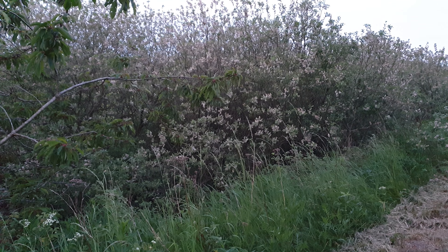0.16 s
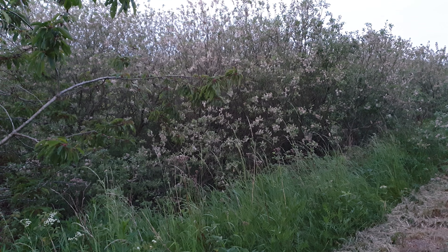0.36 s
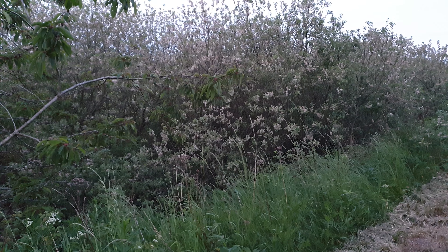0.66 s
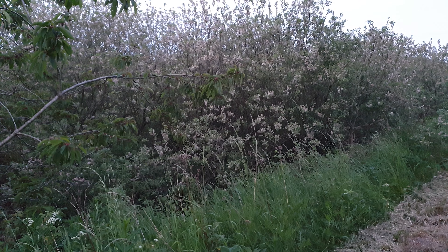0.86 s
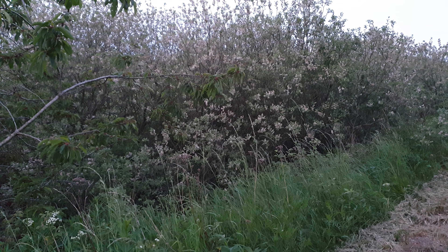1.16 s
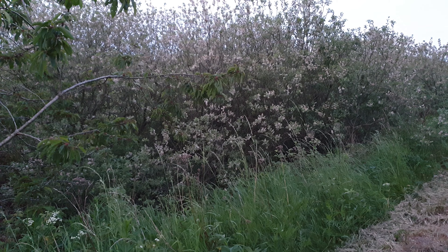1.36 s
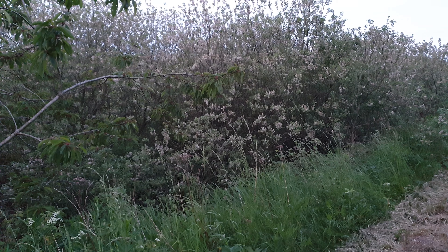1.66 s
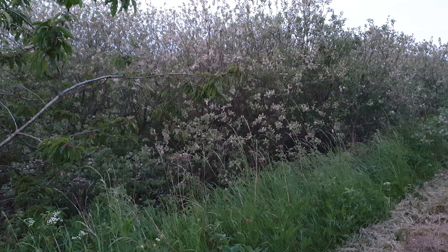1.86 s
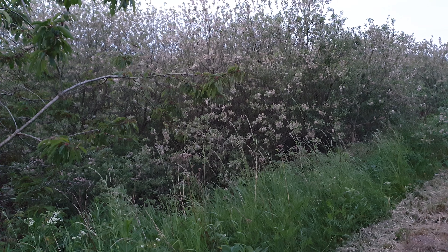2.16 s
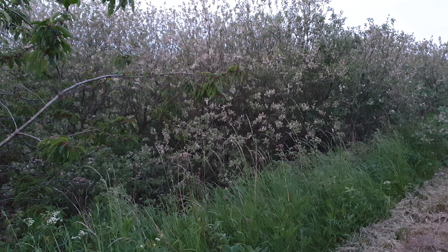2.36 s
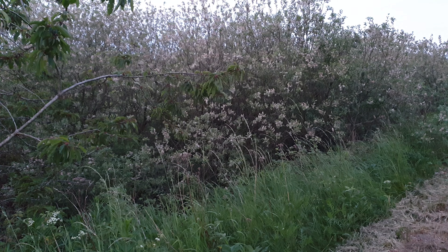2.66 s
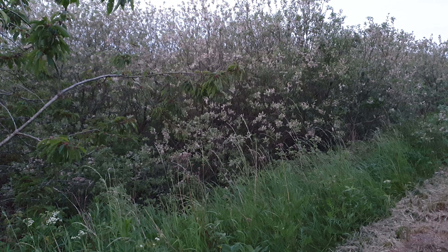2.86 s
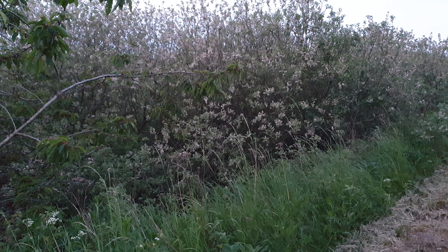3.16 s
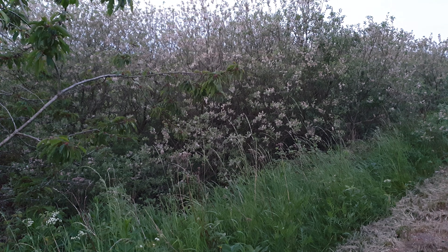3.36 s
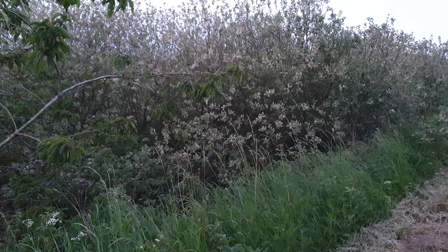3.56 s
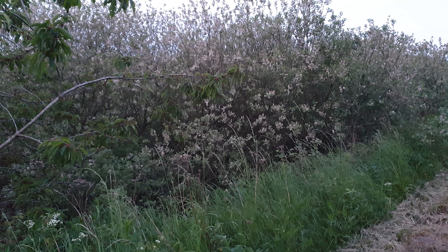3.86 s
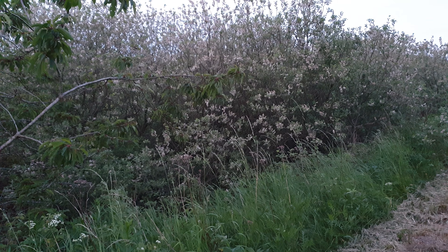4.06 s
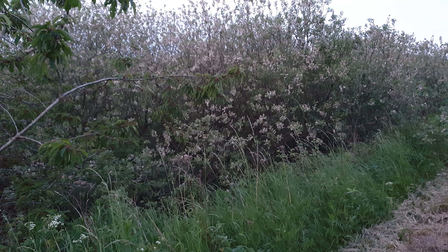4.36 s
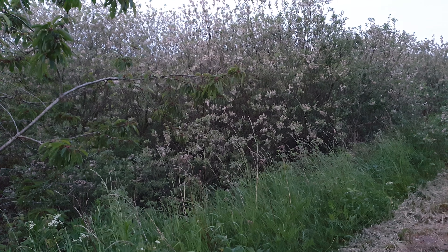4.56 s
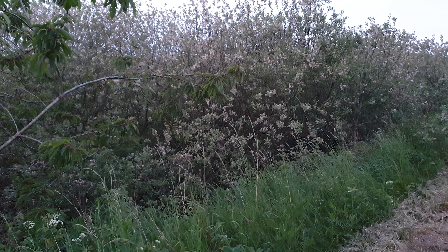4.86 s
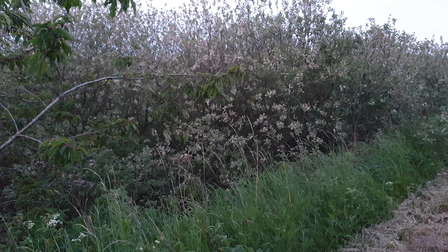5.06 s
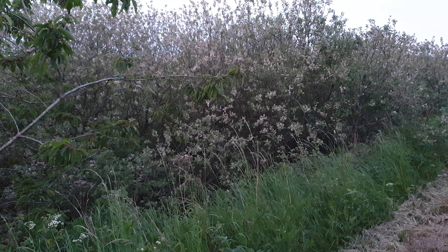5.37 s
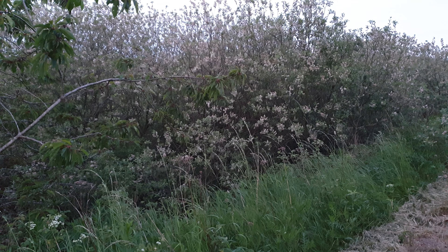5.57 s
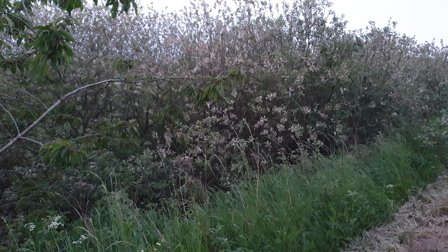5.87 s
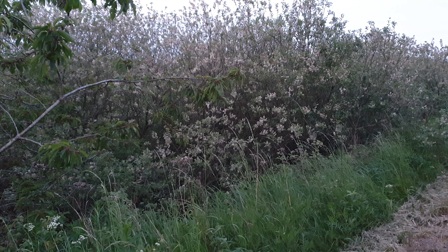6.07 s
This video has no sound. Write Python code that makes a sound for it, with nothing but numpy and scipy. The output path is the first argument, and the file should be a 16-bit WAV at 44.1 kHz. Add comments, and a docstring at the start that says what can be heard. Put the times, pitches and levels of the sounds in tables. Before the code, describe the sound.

A nightingale sings in a hedge among fields, slightly to the left, each note ringing briefly among the leaves. Two rising whistles come in the first 0.6 seconds, then two thin, very high falling whistles at about 1 and 1.5 seconds. Four lower, fluttering warbles follow from 1.8 to 3 seconds. Seven sharp ticks grow louder from 3.1 to 4.2 seconds. Eight quick pairs of diving chips, the loudest part of the song, run from 4.4 to 5.6 seconds, and a dry rattle carries on to the end, just after 6 seconds. Wind rumbles unevenly on the microphone, mostly on the right, with thumps near 0.5 and 4.3 seconds and stronger ones from 5.6 seconds. A distant vehicle's soft tyre roar swells at around 2 seconds and fades by 5. A few faint far birds and a light hiss of air lie underneath.

```python
"""In a hedge among fields, a nightingale sings one phrase: rising and falling whistles, four warbles,
seven sharp ticks, eight pairs of low chips and a dry rattle. Its voice box makes sliding tones, with
bursts of noise in the ticks and rattle. Twigs and leaves scatter every note. Wind buffets the
microphone, mostly on the right; far birds sing and a distant vehicle's tyre roar swells and fades."""
import sys
import numpy as np
from scipy import signal
from scipy.fft import rfft, irfft
from scipy.io import wavfile
from scipy.ndimage import uniform_filter1d

SR = 44100
rng = np.random.default_rng(int(sys.argv[2]) if len(sys.argv) > 2 else 0)


def store_pcm(level_fs):
    """Save levels as 16-bit WAV."""
    pcm = np.round(np.clip(level_fs, -1, 1) * 32767).astype(np.int16)
    wavfile.write(sys.argv[1], SR, np.atleast_2d(pcm).T)


N = 273861
T = np.arange(N) / SR

# Levels in the tables are starting values; the functions turn them up or down for the mix.
# A rising whistle holds its low note, then slides up.
# Each row: share of its length, height (0 is the low note, 1 the top note), level in dB.
RISE_SHAPE = [(0, .015, -25.5), (.15, 0, -12), (.27, .012, -14.5), (.39, -.03, -22.5), (.53, 0, -8),
              (.594, .08, -16.5), (.667, .48, -8), (.758, .75, -2.5), (.864, 0.98, -0.5), (.94, 0.95, -7),
              (1, 1, -22)]
# A falling whistle flicks up, thins out, then sinks and swells. Rows as above.
FALL_SHAPE = [(0, -.05, -22), (.06, .68, -21.5), (.14, .88, -32), (.32, 1, -35), (.45, .73, -16.5),
              (.55, .4, -8.5), (.69, .21, -17.5), (.845, .12, 0), (.93, 0.059, -9.5), (1, -0.035, -21.5)]
# Rising whistles, the first already under way. Each row: start and length in seconds,
# low and top note in Hz, level in dB, overtones at two and three times the pitch in dB.
RISING_WHISTLES = [(-.212, .3, 2670, 4690, -38, -40.5, -32), (.27, .33, 2675, 4645, -39.5, -44, -43)]
# Falling whistles. Rows as above, with only the first overtone.
FALLING_WHISTLES = [(0.952, .177, 6250, 7850, -36.5, -33), (1.484, .151, 6164, 8300, -36.5, -14)]
# How long the hedge rings. Each row: frequency in Hz, seconds to fade by 60 dB.
HEDGE_RING = [(1000, .45), (2000, 0.39), (4500, 0.34), (6500, 0.35), (12000, 0.4)]
# Sound from all sides. Each row: frequency in Hz, how alike left and right are (1 is the same).
EAR_LIKENESS = [(50, 1), (300, 0.67), (1000, 0), (2500, 0.093), (5000, 0), (12000, 0.064)]
# The breeze on the microphone. Each row: time in seconds, left level in dB, right level in dB.
BREEZE = [(0, -61.5, -48.5), (.2, -64, -54.5), (.42, -63, -42), (.62, -66, -49.5), (1.15, -64, -58.5),
          (1.5, -78, -55.5), (1.9, -72.5, -52.5), (2.25, -50.5, -47.5), (2.55, -56.5, -51),
          (2.8, -52.5, -43.5), (3.3, -56, -43), (3.73, -60, -57), (3.95, -58, -50.5), (4.25, -68, -44.5),
          (4.55, -74.5, -71.5), (5.35, -68.5, -66.5), (5.6, -63, -48), (5.82, -65, -45.5),
          (6.05, -60.5, -35.5), (6.21, -62, -37.5)]
# Gusts. Each row: middle and length in seconds, level in dB, left minus right in dB.
GUSTS = [(0.336, 0.089, -48, -28), (1.31, 0.077, -51.5, -28), (1.404, 0.05, -53.5, -30),
         (1.665, 0.3, -52.5, -27.5), (2.272, 0.069, -44.5, -5), (2.419, 0.18, -54.5, 10.5),
         (3.064, 0.085, -50, -35), (3.268, 0.093, -47.5, -28), (3.581, 0.25, -46.5, -18),
         (3.907, 0.16, -51, -8), (3.996, 0.072, -45.5, -15), (4.203, 0.057, -46, -1),
         (4.789, 0.086, -54, 23), (5.031, 0.21, -50.5, 29), (5.128, 0.083, -53, -21),
         (5.529, 0.11, -52, -29), (5.668, 0.046, -37.5, -17), (5.939, 0.067, -41, -28)]
# Thumps of wind on the right. Each row: middle in seconds, level in dB, pitch in Hz.
BUFFETS = [(0.467, -28.5, 119), (4.261, -35, 113), (5.656, -25.5, 59.4), (5.732, -26.5, 163),
           (6.05, -26, 115), (6.138, -26, 97)]
# The wind's rumble. Each row: frequency in Hz, level in dB.
WIND_COLOUR = [(15, -33.5), (30, -12), (45, 2.5), (62, 5), (85, -3), (130, -11), (200, -21), (300, -27),
               (450, -52.5), (900, -73)]
# The passing vehicle. Each row: time in seconds, level in dB, centre of its noise band in Hz.
VEHICLE_PASS = [(0, -79.5, 1098), (1.1, -82.5, 1237), (1.698, -70, 1164), (2.2, -62, 1110),
                (2.802, -63, 1050), (3.499, -61.5, 837), (4.099, -64.5, 907), (4.599, -70, 790),
                (5.202, -77.5, 635), (6.21, -76.5, 618)]
# What carries of its roar over the fields. Each row: frequency in Hz, level in dB.
ROAR_COLOUR = [(200, -5.5), (560, 0), (1000, 8), (1380, 5), (1530, -6), (2500, -15.5)]
# A fuzzy tone within that roar. Each row: time in seconds, level in dB.
WHINE_LEVELS = [(2.8, -100), (3.3, -74.5), (3.7, -78.5), (4.5, -78.5), (5.1, -80.5), (5.6, -100)]
# Still air and microphone hiss. Each row: frequency in Hz, level in dB.
AIR_COLOUR = [(30, -1.5), (150, 13), (400, -5), (1000, -9), (1700, -14), (2300, 0), (3000, -12.5),
              (4500, -21), (7000, -29.5), (9500, -30.5), (11500, -19.5), (15000, -20)]
# A faint drone at the start. Each row: pitch in Hz, level in dB.
DRONE = [(188.4, -65)]
# Far birds' notes. Each row: start and length in seconds, first and last pitch in Hz, level in dB.
FAR_NOTES = [(0.505, 0.11, 2324, 1970, -69), (0.796, 0.043, 2300, 2475, -67.5),
             (0.887, 0.078, 2990, 3200, -76), (0.959, .32, 3224, 3380, -88), (2.473, 0.14, 2765, 2630, -80),
             (3.414, 0.11, 2296, 2540, -68.5)]
# Warbles, made of arches (quick rises and falls). Each row: first peak in seconds, number of arches,
# opening and held pitch in Hz, then opening, held, closing and overtone levels in dB.
WARBLES = [(1.828, 4, 2038, 2021, -41.5, -34, -35, -24.5), (2.195, 4, 1910, 2045, -45, -35, -44.5, -40.5),
           (2.54, 5, 1936, 2069, -44, -32.5, -38, -36), (2.919, 4, 1926, 2031, -44.5, -33.5, -34.5, -36.5)]
# Ticks. Each row: start in seconds, level of the two flicks in dB, delay of the sweep in seconds,
# its level in dB, its rough middle pitch in Hz.
TICKS = [(3.1424, -47.5, 0.013, -51, 3830), (3.3217, -46, 0.01, -50.5, 3830),
         (3.498, -47, 0.012, -55.5, 3590), (3.6735, -45.5, 0.013, -52, 3710),
         (3.8375, -44.5, .0135, -46.5, 3757), (4.015, -41, 0.013, -46, 3960),
         (4.1852, -41, 0.014, -43.5, 3865)]
# The rasp in ticks and rattle. Each row: frequency in Hz, level in dB.
RASP_COLOUR = [(1200, -15), (2300, -1), (3000, 4.5), (3900, 22), (5000, -19), (6400, 16.5), (8000, -55),
               (9500, -3.5), (11300, -10), (14000, 4), (15300, -17.5)]
# How the open beak sends out ticks and rattle. Each row: frequency in Hz, boost in dB.
BEAK_BOOST = [(2000, -6.5), (3000, -7.5), (3900, -4), (5000, 12.5), (6400, -1), (8500, -2), (9700, 0.5),
              (11300, 5.5), (13500, -4.5), (15500, -12)]
# Pairs of chips. Each row: start and delay of the second chip in seconds, first and second level in dB.
CHIP_PAIRS = [(4.368, 0.047, -39, -33), (4.5487, .0553, -34, -33.5), (4.728, .0474, -33, -30),
              (4.8735, 0.049, -32, -29.5), (5.0278, 0.047, -32, -30), (5.1759, .0547, -32, -31.5),
              (5.348, 0.051, -32.5, -32.5), (5.5052, 0.049, -33.5, -31)]
# One chip's dive. Each row: seconds since its start, share of the starting pitch, level in dB.
CHIP_DIVE = [(0, 1, -30.5), (.0012, 0.93, -10), (.003, 0.851, 0.5), (.005, 0.744, -3.5), (.008, 0.641, -9),
             (.012, 0.535, -11.5), (0.016, .485, -15.5), (.021, 0.47, -25), (0.024, 0.28, -45)]
# The rattle's bursts of three clicks. Each row: start in seconds, level of the middle click in dB.
RATTLE_BURSTS = [(5.6585, -50.5), (5.7705, -49.5), (5.8765, -47.3), (5.9838, -45.5), (6.0874, -46.5),
                 (6.189, -44)]


def amp(db):
    """Turns decibels into a multiplier."""
    return 10 ** (np.asarray(db) / 20)


def unit(x):
    """Scales a sound to an average strength (rms) of 1."""
    return x / np.sqrt(np.mean(x ** 2) + 1e-20)


def look_up(table, hz):
    """Reads between the rows of a frequency table."""
    f, value = np.transpose(table)
    return np.interp(np.log(hz + 1), np.log(f + 1), value)


def add(mix, s, sound):
    """Mixes a sound in at s seconds."""
    part = mix[max(round(s * SR), 0):][:len(sound)]
    part += sound[:len(part)]


def colour(x, table):
    """Turns each frequency up or down by a table's dB."""
    count = x.shape[-1]
    return irfft(rfft(x) * amp(look_up(table, np.fft.rfftfreq(count, 1 / SR))), count)


def wander(count, hz):
    """A random wobble of strength 1, up to about hz."""
    f = np.fft.rfftfreq(count, 1 / SR)
    return unit(irfft(rfft(rng.standard_normal(count)) / (1 + (f / hz) ** 4), count))


def diffuse(count):
    """Noise from all sides: left and right are alike in the bass, unrelated in the treble."""
    left, other = rfft(rng.standard_normal((2, count)))
    same = np.clip(look_up(EAR_LIKENESS, np.fft.rfftfreq(count, 1 / SR)), -1, 1)
    right = same * left + np.sqrt(1 - same ** 2) * other
    return irfft(np.array([left, right]), count)


def tone(hz, second_db=-60, third_db=-60):
    """A tone that follows a pitch curve, with two overtones."""
    phase = 2 * np.pi * np.cumsum(hz) / SR
    levels = enumerate((0, second_db, third_db), 1)
    return np.sqrt(2) * sum(amp(db) * np.sin(k * phase) * (k * hz < SR / 2) for k, db in levels)


def overtones(hz, levels):
    """Multiples of a pitch curve, given as (multiple, dB); they fade out near 15000 Hz."""
    phase = 2 * np.pi * np.cumsum(hz) / SR
    return np.sqrt(2) * sum(amp(db) * np.sin(k * phase) * np.clip((15000 - k * hz) / 1500, 0, 1)
                            for k, db in levels)


def whistles(tremble=.0055):
    """Long sliding notes that tremble slightly; returns tones and overtones."""
    tones, upper = np.zeros((2, N))
    for shape, notes in ((RISE_SHAPE, RISING_WHISTLES), (FALL_SHAPE, FALLING_WHISTLES)):
        at, height, shape_db = np.transpose(shape)
        for s, length, low_hz, top_hz, db, *levels in notes:
            progress = (np.arange(max(s, 0), s + length, 1 / SR) - s) / length
            slide = uniform_filter1d(np.interp(progress, at, height), size=300)
            pitch = low_hz + (top_hz - low_hz) * slide
            pitch *= 1 + tremble * wander(len(pitch), 180)
            swell = amp(db + np.interp(progress, at, shape_db)) * signal.windows.tukey(len(pitch), .05)
            add(tones, s, swell * tone(pitch))
            richness = np.sqrt(swell / swell.max())  # richer where louder
            add(upper, s, swell * richness * overtones(pitch, enumerate(levels, 2)))
    return tones, upper


def hedge(x, near_db, tail_db, near_ring_s=.105, twig_db=-12, trunk_db=-22, lead_s=.00011, left_db=-2):
    """A note reaches the left side first; twigs and leaves scatter it, farther bushes let it linger."""
    t = np.arange(SR * 3 // 4) / SR
    twigs = unit(diffuse(len(t)) * np.exp(-t / .0091) * np.minimum(t / .0041, 1))
    near = unit(diffuse(len(t)) * amp(-60 * t / near_ring_s) * np.minimum(t / .004, 1))
    hz, times, bands = signal.stft(diffuse(len(t)), SR, nperseg=256)
    bands *= amp(-60 * times / look_up(HEDGE_RING, hz)[:, None])
    tail = signal.istft(bands, SR, nperseg=256)[1][:, :len(t)]
    tail = unit(tail * np.minimum(t / .029, 1))
    echoes = (amp(twig_db) * twigs + amp(near_db) * near + amp(tail_db) * tail) / np.sqrt(len(t))
    echoes[:, round(.015 * SR)] += amp(trunk_db)  # one clear echo off a nearby trunk
    direct = np.array([x, np.roll(x, round(lead_s * SR))])
    scattered = signal.fftconvolve(x[None], echoes, axes=1)[:, :N]
    return (direct + scattered) * amp([[left_db], [0]])


def wind(lumpy_db=2.5, lumps_hz=6):
    """Swirls of air press on each side of the microphone; a few thump the right one."""
    s, left_db, right_db = np.transpose(BREEZE)
    pressure = amp([np.interp(T, s, left_db), np.interp(T, s, right_db)])
    for at, length, db, pan_db in GUSTS:
        sides = amp([[pan_db / 2], [-pan_db / 2]])
        swell = np.cos(np.pi * np.clip((T - at) / length, -.5, .5)) ** 2
        pressure += amp(db + 3) * swell * sides / np.linalg.norm(sides)
    swirls = unit(colour(rng.standard_normal((2, N)), WIND_COLOUR))
    swirls /= uniform_filter1d(swirls ** 2, size=2600) ** .25  # partly evens out the level
    lumps = amp(lumpy_db * np.tanh([wander(N, lumps_hz) for _ in range(2)]))
    out = amp(1.04) * swirls * lumps * pressure
    for at, db, hz in BUFFETS:
        cycles = np.arange(-2, 2, hz / SR)
        thump = np.sin(2 * np.pi * (cycles + rng.random())) * np.exp(-(cycles / .53) ** 2)
        add(out[1], at - 2 / hz, amp(db) * thump)
    return out


def vehicle(width_octaves=.49, whine_hz=570):
    """A far tyre roar: a soft band of noise that sinks in pitch as it passes, with a faint whine."""
    s, db, centre_hz = np.transpose(VEHICLE_PASS)
    hz, t, bands = signal.stft(diffuse(N), SR, nperseg=1024)
    octaves = np.log2((hz[:, None] + 1) / np.interp(t, s, centre_hz))
    bands /= 1 + (octaves / width_octaves) ** 2 + (octaves / 2) ** 6
    roar = signal.istft(bands, SR, nperseg=1024)[1][:, :N]
    fuzz = wander(N, 40)
    whine = tone(whine_hz * (1 + .02994 * wander(N, 33))) * fuzz
    whine *= amp(np.interp(T, *np.transpose(WHINE_LEVELS)))
    return unit(colour(roar, ROAR_COLOUR)) * amp(np.interp(T, s, db)) + whine


def air(hiss_db=-65):
    """Steady air and microphone hiss, and a low drone that dies away after 0.6 seconds."""
    drone = sum(amp(db) * tone(hz * (1 + .026 * wander(N, 15))) for hz, db in DRONE)
    hiss = amp(hiss_db) * unit(colour(diffuse(N), AIR_COLOUR))
    return hiss + drone * amp(-30 * np.maximum(T - .6, 0))


def far_birds():
    """Faint sliding notes that arrive mostly as echo."""
    out = np.zeros(N)
    for s, length, first_hz, last_hz, db in FAR_NOTES:
        count = int(length * SR)
        add(out, s, amp(db) * tone(np.linspace(first_hz, last_hz, count)) * np.hanning(count))
    return hedge(out, near_db=2, tail_db=3)


def warble_arches(spacing_s=.0305, sag_hz_per_s=330):
    """A warble opens softly, then holds a slowly sagging pitch; gives each arch's time, pitch, levels."""
    for s, count, opening_hz, held_hz, opening_db, held_db, closing_db, upper_db in WARBLES:
        yield s, opening_hz, opening_db, upper_db
        for k in range(1, count):
            hz = held_hz - sag_hz_per_s * (k - 1) * spacing_s
            yield s + k * spacing_s, hz, closing_db if k == count - 1 else held_db, upper_db


def warbles(half_s=.016, pitch_drop=.29, fade_db=21):
    """Pitch and loudness rise and fall together, some thirty times a second; returns tones, overtones."""
    tones, upper = np.zeros((2, N))
    position = np.arange(-half_s, half_s, 1 / SR) / half_s  # -1 to 1, with the arch's top at 0
    dip_db = -fade_db * (1 - np.exp(-abs((position - .05) / .69) ** 3))  # loudest just after the top
    for s, hz, db, upper_db in warble_arches():
        unsteady = 1 + .008 * wander(4096, 120)[:len(position)]
        pitch = hz * (1 - pitch_drop * abs(position) ** 2.3) * unsteady
        level = amp(db) * signal.windows.tukey(len(position), .15)
        add(tones, s - half_s, tone(pitch) * level * amp(dip_db))
        buzz = overtones(pitch, [(2, 0), (6, dip_db - 8)])
        add(upper, s - half_s, buzz * level * amp(upper_db - 11.5))
    return tones, upper


def flick(length_s, first_hz, last_hz, rough, second_db=-30, third_db=-40):
    """A very fast, slightly rough sweep in pitch."""
    count = int(length_s * SR)
    pitch = np.geomspace(first_hz, last_hz, count) * (1 + rough * wander(2048, 1900)[:count])
    return unit(tone(pitch, second_db, third_db) * signal.windows.tukey(count, .6))


def rasp(decay_s):
    """A dry burst of noise, coloured by the throat and the open beak."""
    t = np.arange(2048) / SR
    noise = unit(colour(rng.standard_normal(len(t)), RASP_COLOUR))
    return noise * np.exp(-t / decay_s) * (1 - np.exp(-t / .0001))


def ticks():
    """Two short flicks, then a lower whipping sweep with a strong octave and a little rasp."""
    out = np.zeros(N)
    for s, flick_db, delay, sweep_db, hz in TICKS:
        add(out, s, amp(flick_db - 1) * flick(.005, 7400, 5400, rough=.035))
        add(out, s + .0016, amp(flick_db - 3.5) * rasp(.007))
        add(out, s + delay - .005, amp(flick_db) * flick(.006, 7400, 5400, rough=.04))
        octave_db = 1 + 1.5 * (sweep_db + 47)  # the harder the sweep, the stronger its octave
        sweep = flick(.0095, hz * 1.33, hz * .68, rough=.022, second_db=octave_db, third_db=-12)
        add(out, s + delay, amp(sweep_db + 3.5) * sweep)
        add(out, s + delay, amp(sweep_db - 1) * rasp(.034))
    return colour(amp(-4.5) * out, BEAK_BOOST)


def chips(easy_hz=2540, easy_db=-32.5, hz_per_db=49.5):
    """Paired notes that dive about an octave; one pushed beyond the easy level starts higher."""
    out = np.zeros(N)
    at, share, shape_db = np.transpose(CHIP_DIVE)
    t = np.arange(0, at[-1], 1 / SR)
    dive = uniform_filter1d(np.interp(t, at, share), size=60)
    swell = uniform_filter1d(amp(np.interp(t, at, shape_db)), size=40) * signal.windows.tukey(len(t), .08)
    for start, gap, first_db, second_db in CHIP_PAIRS:
        for s, db in ((start, first_db), (start + gap, second_db)):
            hz = easy_hz + hz_per_db * max(db - easy_db, 0)
            add(out, s, amp(db - 1.5) * swell * tone(hz * dive, second_db=-42, third_db=-48))
    return out


def rattle(spacing_s=.025, growth_db=2):
    """Each click is a snap of noise around two harsh downward flicks, at a slightly random pitch."""
    out = np.zeros(N)
    clicks = [(s + k * spacing_s, db + (k - 1) * growth_db) for s, db in RATTLE_BURSTS for k in range(3)]
    for (s, db), tension in zip(clicks, rng.uniform(.92, 1.08, len(clicks))):
        add(out, s, amp(db + 9.5) * rasp(.0032))
        high = flick(.004, 7000 * tension, 5600 * tension, rough=.06)
        low = flick(.0042, 4500 * tension, 2100 * tension, rough=.11, second_db=-3, third_db=-4)
        add(out, s + .0005, amp(db - 3.5) * high)
        add(out, s + .0005, amp(db - 1) * low)
    return colour(amp(-4.5) * out, BEAK_BOOST)


def scene():
    """The bird in its hedge, then the field around it."""
    whistled, whistle_overtones = whistles()
    warbled, warble_overtones = warbles()
    mellow = amp(-1) * warbled + amp(2) * chips()
    bright = amp(-6.5) * whistle_overtones + amp(-6) * warble_overtones
    # the higher the note, the more of it the leaves scatter
    low = hedge(mellow, near_db=-7.5, tail_db=-12.5, near_ring_s=.096, twig_db=-24.5,
                trunk_db=-25, lead_s=.00009)
    high = hedge(amp(-2.46) * whistled, near_db=-7, tail_db=-6, near_ring_s=.18, twig_db=-5.5,
                 left_db=-3.4)
    upper = hedge(bright, near_db=7.5, tail_db=-7.5, near_ring_s=.073, twig_db=-2.5, left_db=-4)
    ticked = hedge(ticks(), near_db=-.5, tail_db=-6.5, near_ring_s=.21, twig_db=-7, lead_s=.00009)
    rattled = hedge(rattle(), near_db=-2.5, tail_db=-7, near_ring_s=.21, twig_db=-8)
    return low + high + upper + ticked + rattled + far_birds() + wind() + vehicle() + air()


def record(dry):
    """Cuts the treble above 15800 Hz."""
    low_pass = signal.firwin(511, 15800, window=("kaiser", 9), fs=SR)
    return signal.oaconvolve(dry, low_pass[None], "same")


dry = scene()
out = record(dry)
store_pcm(out)
```